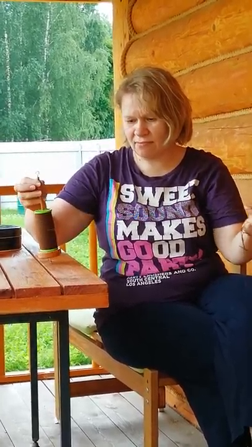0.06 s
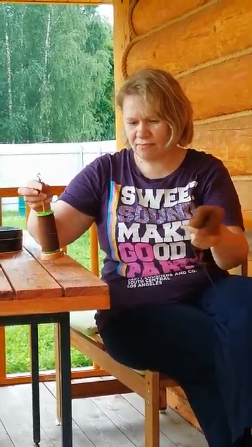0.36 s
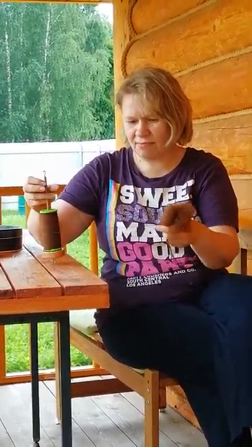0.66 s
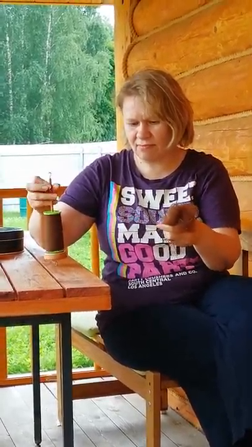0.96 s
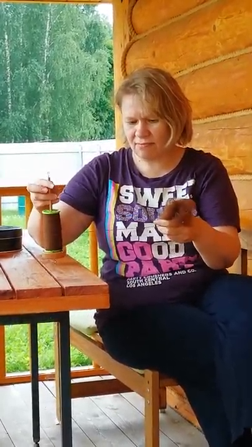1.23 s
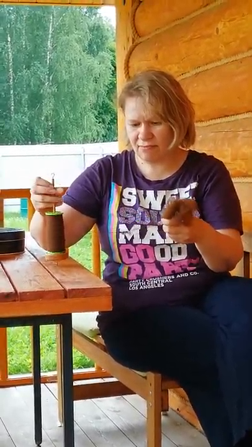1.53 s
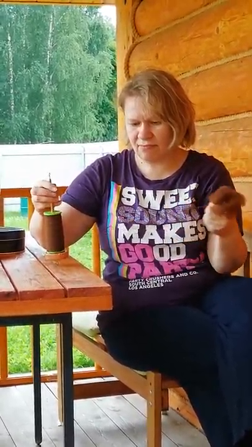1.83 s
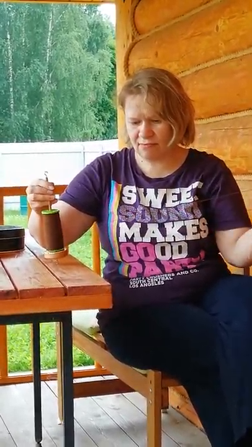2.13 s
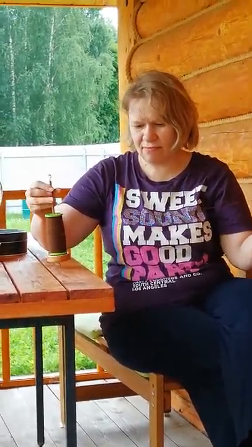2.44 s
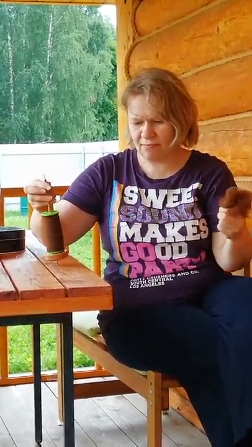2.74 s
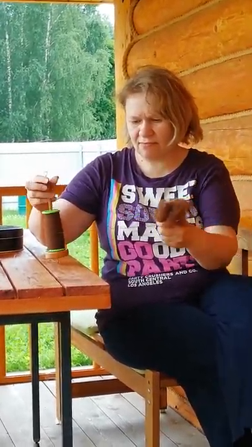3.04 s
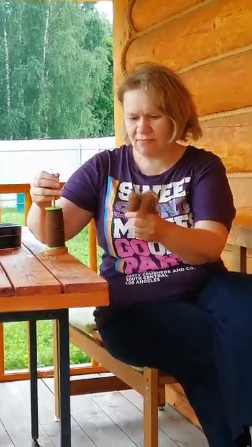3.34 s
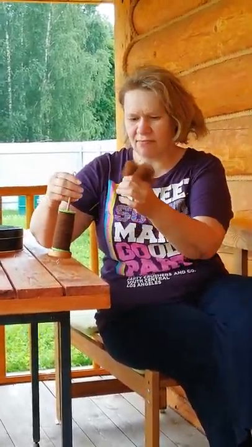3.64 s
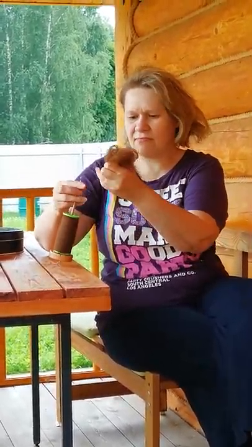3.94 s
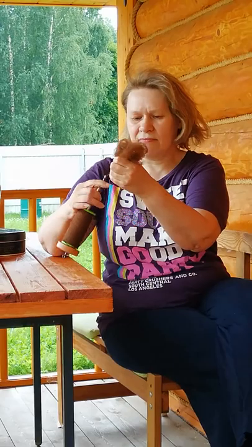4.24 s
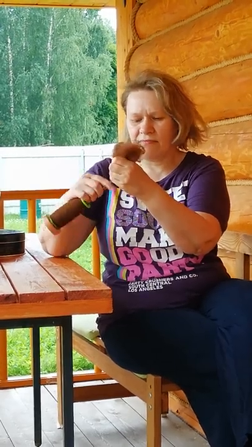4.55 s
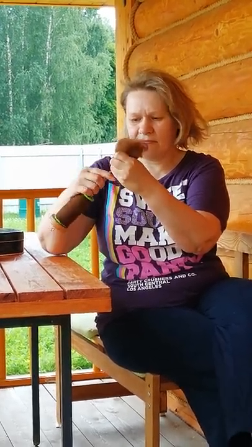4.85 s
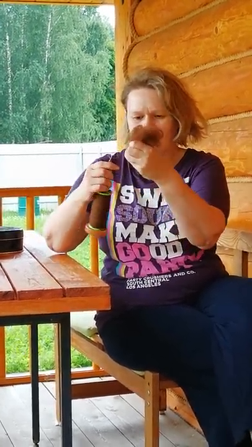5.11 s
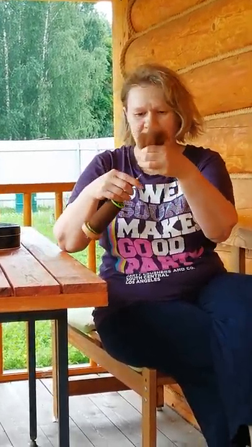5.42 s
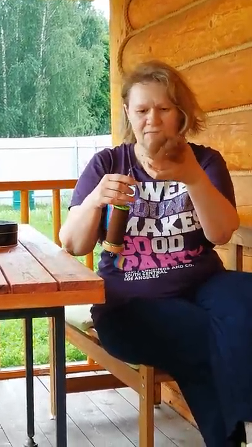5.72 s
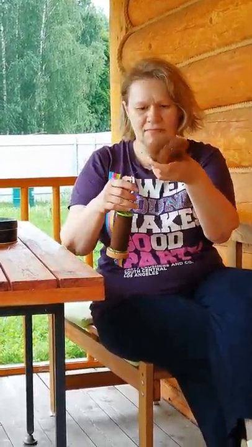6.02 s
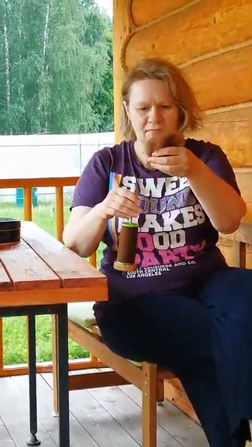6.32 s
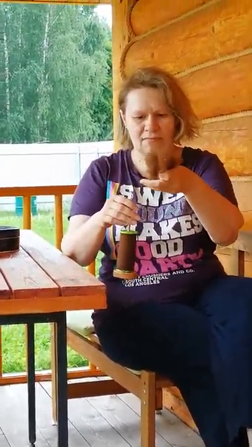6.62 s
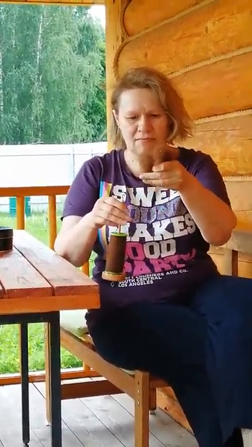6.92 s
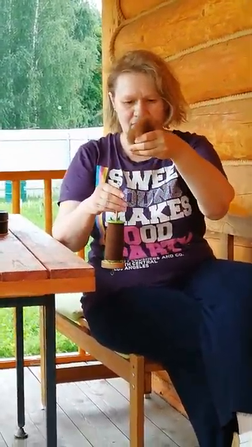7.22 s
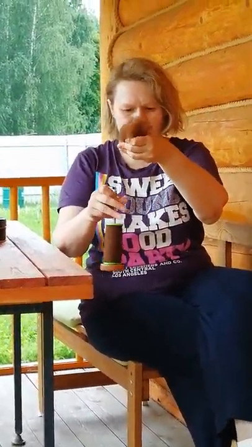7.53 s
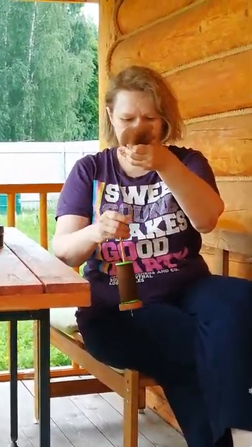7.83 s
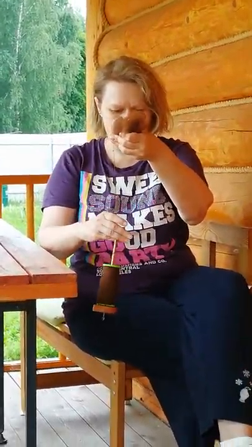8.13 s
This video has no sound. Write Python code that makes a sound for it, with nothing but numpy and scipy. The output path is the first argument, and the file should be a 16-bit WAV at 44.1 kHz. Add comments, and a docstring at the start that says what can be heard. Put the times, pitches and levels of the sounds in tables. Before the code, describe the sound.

Uneven gusts of wind rumble and thump on the microphone outdoors, over a faint hiss of trees and a few tiny handling scuffs.

```python
"""Wind buffeting a phone on a porch

Uneven gusts strike the two microphone ports. One wind force drives a low rumble of large swirls, a flutter
of eddies and, in the hardest gusts, a tearing rush; single hard eddies thump out of the stream.
Behind it trees hiss steadily, something far off hoots softly (perhaps a dog), friction from handling yarn
and a spindle makes faint scuffs and ticks, and a bird calls once."""
import sys
import numpy as np
from scipy.fft import rfft, irfft, next_fast_len
from scipy.io import wavfile
from scipy.ndimage import uniform_filter1d, map_coordinates

SR = 44100
rng = np.random.default_rng(int(sys.argv[2]) if len(sys.argv) > 2 else 0)


def store_wav(level_fs):
    """Save 16-bit WAV to argv[1]."""
    pcm = np.round(np.clip(np.atleast_2d(level_fs), -1, 1) * 32767)
    wavfile.write(sys.argv[1], SR, pcm.T.astype(np.int16))


N = 364707

# gusts on top of the breeze: (start [s], hold [s], force [dB], extra rumble [dB], extra tearing [dB])
WIND_GUSTS = [(0.123, 0.13, -54, 3.5, 0), (0.45, 0.27, -55, 4, 0), (1.223, 0.1, -52.5, 2, 0),
              (1.545, 0.18, -41.5, 0, -2), (2.108, 0.03, -60.5, 0, 2), (2.404, 0.089, -51.5, -6, 0),
              (2.612, 0.067, -41, 2.5, -7), (2.759, 0.014, -39, -3.5, 5), (3.223, 0.0087, -36, 0, 3),
              (3.279, 0.012, -36.5, 7.5, 11), (3.473, 0.061, -36.5, 4, -4), (3.592, 0.033, -32, 2.5, -3),
              (3.658, 0.16, -30, -1, 4.5), (4.267, 0.12, -41.5, -1, -3), (4.522, 0.16, -42.5, 2, -10),
              (4.833, 0.023, -46.5, -9, -3), (5.1, 0.17, -41, 3, -5), (5.319, 0.22, -37, -6, -14),
              (5.617, 0.084, -40.5, -16, 11), (5.761, 0.1, -34, 1, 7), (5.995, 0.14, -32.5, -1, 6),
              (6.36, 0.064, -32, -0.5, 6), (6.578, 0.28, -30.5, -4.5, 0.5), (6.885, 0.11, -36, 4, 11),
              (7.117, 0.076, -33, 5, 1), (7.227, 0.2, -35.5, 4.5, -16), (7.707, 0.2, -38, -2, 1),
              (8.126, 0.022, -41, 4, -11)]
# growth of each wind layer [dB per dB of force]
RUMBLE_SLOPE, FLUTTER_SLOPE, TEARING_SLOPE = 0.61, 0.87, 2.37


def amp(db):
    """Amplitude ratio: a factor of ten for every 20 dB."""
    return 10 ** (np.asarray(db) / 20)


def unit(x):
    """Normalisation to rms 1."""
    return x / np.sqrt(np.mean(x ** 2) + 1e-20)


def along(points, hz):
    """Interpolation of (frequency [Hz], value) points on a logarithmic axis."""
    knots_hz, values = np.transpose(points)
    return np.interp(np.log(hz + 1), np.log(knots_hz + 1), values)


def curves(rows):
    """Linear interpolation in time: one value per sample for each column after the first."""
    times, *columns = np.transpose(rows)
    return [np.interp(np.arange(N) / SR, times, column) for column in columns]


def wobble(rate):
    """Smooth random modulation: a spline through rate Gaussian knots a second."""
    knots = rng.standard_normal(int(N * rate / SR) + 4)
    return map_coordinates(knots, [np.arange(N) * rate / SR])


def filtered(x, response):
    """Linear filtering: the spectrum is multiplied by a complex frequency response."""
    size = next_fast_len(N + 8192)
    return irfft(rfft(x, size) * response(np.fft.rfftfreq(size, 1 / SR)), size)[..., :N]


def steady(x, size):
    """Division by the running rms holds a stereo flow near rms 1 over stretches of size samples."""
    power = uniform_filter1d(uniform_filter1d(np.mean(x ** 2, axis=0), size), size)
    return x / np.sqrt(np.abs(power) + 1e-12)


def wind_force(extra_db, attack_s=0.01, release_s=0.018, usual_db=-40):
    """Power addition of the breeze and exponentially rising and falling gusts, in dB over the usual."""
    # the breeze between the gusts: (time [s], force [dB])
    breeze = [(0.0, -51.5), (0.3, -65), (0.85, -72), (1.13, -70), (1.42, -61), (1.65, -64), (1.92, -80.5),
              (2.26, -78), (2.55, -47), (2.84, -61), (3.17, -58), (3.42, -40.5), (3.92, -53.5),
              (4.17, -57.5), (4.5, -49), (4.78, -60.5), (4.91, -50), (5.03, -52.5), (5.53, -45),
              (6.17, -36.5), (7.03, -40.5), (7.6, -47.5), (8.04, -51), (8.27, -52.5)]
    breeze_db, = curves(breeze)
    power = amp(breeze_db) ** 2
    for (start, hold, db, *_), more_db in zip(WIND_GUSTS, extra_db):
        age = np.arange(N) / SR - start
        rise = np.minimum(age, 0) / attack_s
        fall = np.maximum(age - hold, 0) / release_s
        envelope = np.exp(np.maximum(rise - fall, -40))
        power += (amp(db + more_db) * envelope) ** 2
    return 10 * np.log10(power) - usual_db


def puffs(force_db, depth_db=8, rate=40, firm_db=8, firm_width_db=4):
    """Intermittency: a light flow keeps catching and letting go of the phone; a hard one holds firmer."""
    holes = np.logaddexp(0, 2.1 * wobble(rate))
    ragged = unit(amp(-depth_db * holes))
    firm_share = 0.5 / (1 + np.exp((firm_db - force_db) / firm_width_db))
    return np.sqrt(firm_share + (1 - firm_share) * ragged ** 2)


def eddies(times, strengths, pitches_hz, ports, size=2400):
    """Convected pressure: each eddy is one push and pull on one port; small fast eddies are sharper."""
    lags = np.arange(size) - size // 2
    index = np.round(times * SR).astype(int)[:, None] + lags
    passing = 1 - 1j * np.outer(pitches_hz, np.pi * lags / SR)
    phasors = strengths * np.exp(2j * np.pi * rng.random(len(times)))
    pulses = np.real(phasors[:, None] / passing ** 3)  # the spectrum of each peaks at its pitch
    pulses = pulses * np.hanning(size) * ((index >= 0) & (index < N))
    slots = np.clip(index, 0, N - 1) + N * np.round(ports).astype(int)[:, None]
    return np.bincount(slots.ravel(), pulses.ravel(), 2 * N).reshape(2, N)


def crossfeed(ports, low_hz=42, high_hz=980, lag_s=0.00078, leak=0.55):
    """Crosstalk: the phone band-passes the wind and feeds each port, delayed, to the other channel."""
    ports = filtered(ports, lambda hz: 1j * hz / (low_hz + 1j * hz) / (1 + (hz / high_hz) ** 8))
    return ports + filtered(ports[::-1], lambda hz: leak * np.exp(-2j * np.pi * hz * lag_s))


def eddy_stream(pitch_hz, pitch_spread, spread_db, count, size):
    """Shot noise: many eddies on both ports merge into a flow of rms 1 around a moving pitch."""
    times = (np.arange(count) + rng.random(count)) / count * (N - 1) / SR
    detune, strength = rng.standard_normal((count, 2)).T
    pitches_hz = pitch_hz[(times * SR).astype(int)] * np.exp(pitch_spread * np.clip(detune, -2, 2))
    ports = rng.integers(2, size=count)
    stream = eddies(times, amp(spread_db * strength), pitches_hz, ports, size)
    return steady(crossfeed(stream), size=1500)


def rumble(force_db, usual_level_db=-39.5, side_db=-20):
    """Spatial coherence: swirls larger than the phone press on both ports nearly alike."""
    # pressure spectrum of the swirls: (frequency [Hz], relative density [dB])
    swirl_spectrum = [(8, -28.5), (22, -1.5), (45, -1.5), (75, -2.5), (110, -11.5), (170, -26), (300, -68),
                      (600, -120)]
    mid, side = filtered(rng.standard_normal((2, N)), lambda hz: amp(along(swirl_spectrum, hz)))
    side = side * amp(side_db)
    pressure = steady(np.array([mid + side, mid - side]), size=2000)
    return amp(usual_level_db + RUMBLE_SLOPE * force_db) * pressure


def flutter(force_db, usual_level_db=-39.5, usual_hz=84, octaves_per_db=0.04):
    """Frequency scales with flow speed: in harder wind the eddies pass faster and sound brighter."""
    pitch_hz = usual_hz * 2 ** (octaves_per_db * force_db)
    stream = eddy_stream(pitch_hz, pitch_spread=0.13, spread_db=3.5, count=1900, size=1500)
    return amp(usual_level_db + FLUTTER_SLOPE * force_db) * stream


def tearing(force_db, usual_level_db=-69, usual_hz=215, octaves_per_db=0.01):
    """Turbulent cascade: hard gusts break into many small eddies, a higher rush that grows steeply."""
    pitch_hz = usual_hz * 2 ** (octaves_per_db * force_db)
    stream = eddy_stream(pitch_hz, pitch_spread=0.1, spread_db=7.0, count=3600, size=600)
    return amp(usual_level_db + TEARING_SLOPE * force_db) * stream


def wind():
    """Common modulation: one force drives three layers; big swirls follow it slower and puff less."""
    *_, extra_rumble_db, extra_tearing_db = np.transpose(WIND_GUSTS)
    swirl_db = wind_force(extra_rumble_db / RUMBLE_SLOPE, attack_s=0.014, release_s=0.03)
    eddy_db = wind_force(np.zeros(len(WIND_GUSTS)))
    tear_db = wind_force(extra_tearing_db / TEARING_SLOPE)
    grip = puffs(eddy_db)
    return np.sqrt(grip) * rumble(swirl_db) + grip * (flutter(eddy_db) + tearing(tear_db))


def diffuse_noise(spectrum):
    """A diffuse field of rms 1: the ratio of mid to side sets how alike the two channels are."""
    # likeness of left and right: (frequency [Hz], correlation [-1 to 1])
    correlation = [(60, -0.2), (200, 1), (380, -0.5), (700, -0.48), (1000, 0.18), (1300, 0.62),
                   (2200, -0.22), (4400, -0.05), (8000, 0)]
    # stereo balance: (frequency [Hz], left minus right [dB])
    balance = [(400, 0), (700, 2), (1200, -4), (2300, -1), (4400, -1.5), (8000, 0)]

    def colour(hz):
        angle = np.arccos(np.clip(along(correlation, hz), -1, 1)) / 2
        return amp(along(spectrum, hz)) * np.array([np.cos(angle), np.sin(angle)])

    mid, side = filtered(rng.standard_normal((2, N)), colour)
    stereo = np.array([mid + side, mid - side])
    return unit(filtered(stereo, lambda hz: amp(np.outer([0.5, -0.5], along(balance, hz)))))


def trees(wash_gain_db=7, leaf_gain_db=3.5, shiver_db=0.41):
    """Broadband flow noise: a far wash of wind in the wood and the finer hiss of leaves."""
    # slow drift of the background, before the gains: (time [s], wash level [dB], leaf level [dB])
    drift = [(0.0, -73, -70.5), (1.3, -73, -70.5), (3.0, -73.5, -71), (3.7, -75, -73), (4.2, -73.5, -71),
             (5.2, -74.5, -71.5), (6.3, -75.5, -73), (8.27, -74.5, -72.5)]
    # wind in the far wood: (frequency [Hz], relative density [dB])
    wash_spectrum = [(20, -8), (60, -3.5), (150, 8), (250, 0), (400, 0), (600, -3), (850, -2), (1150, -1),
                     (1650, -4), (2200, -8.5), (3500, -12.5), (8000, -54)]
    # hiss of the leaves: (frequency [Hz], relative density [dB])
    leaf_spectrum = [(700, -36), (1500, -3), (2400, -2), (3300, -1), (4700, -0.5), (6200, -4.5),
                     (8200, -6.5), (10000, -10.5), (12500, -12.5), (15700, -13)]
    wash_db, leaf_db = curves(drift)
    wash = amp(wash_db + wash_gain_db) * diffuse_noise(wash_spectrum)
    hiss = amp(leaf_db + leaf_gain_db + shiver_db * wobble(20)) * diffuse_noise(leaf_spectrum)
    return wash + hiss


def thumps(core_gain_db=-2, core_hz=300, shred_gain_db=-12, scatter_s=0.0059, shred_count=3):
    """Pressure transients of single hard eddies: a tight core gives the pop, shreds around it a rasp."""
    # the hardest eddies, before the gains and the crossfeed:
    # (time [s], body level [dB], pitch [Hz], core level [dB], port [0 left, 1 right])
    hard_eddies = [(0.117, -33, 63.4, -56, 0), (0.498, -28, 61.6, -69, 1), (1.622, -30, 76.5, -52, 0),
                   (1.639, -22, 86, -53, 0), (1.688, -23.5, 95, -46, 0), (1.745, -24, 71, -67, 0),
                   (2.41, -24, 61, -60, 0), (2.678, -29, 65, -76, 0), (2.744, -22, 118, -64, 0),
                   (3.149, -33, 154, -33, 0), (3.232, -18, 114, -20.5, 0), (3.275, -19, 141, -38, 0),
                   (3.291, -45, 160, -26.5, 0), (3.495, -21, 104, -58, 0), (3.613, -19.5, 158, -17.5, 0),
                   (3.672, -20, 160, -16, 0), (3.731, -19.5, 161, -32, 1), (3.756, -34, 153, -25, 1),
                   (3.793, -17, 150, -30, 0), (3.814, -15, 93, -46, 1), (3.932, -35.5, 105, -67, 0),
                   (4.007, -29, 72, -68, 1), (4.104, -34.5, 93, -66, 0), (4.232, -30, 97.5, -63, 0),
                   (4.343, -26, 92, -71, 0), (4.666, -23.5, 78, -51, 1), (4.843, -20, 93, -67, 0),
                   (5.109, -23, 97, -62, 1), (5.491, -21.5, 110, -65, 0), (5.511, -23.5, 160, -54, 0),
                   (5.702, -24.5, 148, -44, 0), (5.787, -15, 151, -28, 0), (5.816, -17.5, 123, -38, 0),
                   (5.908, -17.5, 67, -61, 1), (6.028, -13, 162, -15.5, 1), (6.075, -15, 88.5, -39.5, 0),
                   (6.252, -25.5, 110, -32, 1), (6.396, -12.5, 141, -20.5, 1), (6.583, -29, 132, -37, 1),
                   (6.638, -41, 114, -33, 0), (6.662, -16, 161, -26, 0), (6.706, -18, 71, -26.5, 1),
                   (6.729, -14, 102, -26, 1), (6.793, -24, 161, -57, 0), (6.828, -15.5, 128, -40, 0),
                   (6.932, -21.5, 141, -32.5, 1), (6.956, -17.5, 75, -62, 1), (7.138, -14, 116, -25.5, 0),
                   (7.188, -18, 70, -61, 1), (7.253, -23, 132, -63, 1), (7.42, -19.5, 71.5, -50, 0),
                   (7.719, -22.5, 130, -36, 0), (7.764, -22.5, 168, -33, 0), (7.84, -21.5, 124, -36, 0),
                   (7.861, -19.5, 109, -65, 0), (7.934, -20.5, 83, -66, 0), (8.011, -35, 75, -64, 0)]
    times, body_db, pitches_hz, core_db, ports = np.transpose(hard_eddies)
    tight_hz = np.full(len(times), core_hz)
    body = eddies(times, amp(body_db), pitches_hz, ports)
    core = eddies(times, amp(core_db + core_gain_db), tight_hz, ports)
    offsets = scatter_s * rng.standard_normal((len(times), shred_count))
    shreds = sum(eddies(times + offset, amp(core_db + shred_gain_db), tight_hz, ports)
                 for offset in offsets.T)
    return crossfeed(body + core + shreds)


def band(hz, centre_hz, octaves):
    """A Gaussian pass band on a logarithmic frequency axis."""
    return np.exp(-0.5 * (np.log2((hz + 1) / centre_hz) / octaves) ** 2)


def bursts(events, size=16384):
    """Band noise under Gaussian envelopes, from (peak time [s], half-width [s], level [dB], bands)."""
    out = np.zeros((2, N + size))
    age = (np.arange(size) - size // 2) / SR
    hz = np.fft.rfftfreq(size, 1 / SR)
    for time, width, db, bands in events:
        colour = sum(amp(band_db) * band(hz, centre_hz, octaves) for centre_hz, octaves, band_db in bands)
        noise = unit(irfft(rfft(rng.standard_normal((2, size))) * colour))
        start = round(time * SR)
        out[:, start:start + size] += amp(db) * noise * np.exp(-(age / width) ** 2)
    return out[:, size // 2:size // 2 + N]


def hoots():
    """Resonance: a far animal, perhaps a dog, blurred by distance into soft swells of two formants."""
    # the hoots: (peak time [s], half-width [s], level [dB])
    calls = [(0.205, .045, -66.5), (0.61, 0.037, -61), (2.936, 0.073, -62), (4.175, 0.11, -69.5)]
    # resonances of every hoot: (centre [Hz], width [octaves], relative level [dB])
    formants = [(332, 0.16, 0.5), (756, 0.52, -13)]
    return bursts([(time, width, db, formants) for time, width, db in calls])


def handling(grain_db=4.0):
    """Friction noise: each scuff is a short swell in one band, made grainy by fast random modulation."""
    # rubs of yarn, spindle and clothes:
    # (peak time [s], half-width [s], level [dB], centre [Hz], width [octaves])
    scuffs = [(.465, 0.013, -73, 7400, 0.29), (2.124, .02, -64, 3500, 0.6), (2.129, 0.021, -65.5, 1640, .3),
              (4.13, 0.018, -75, 6800, 0.39), (4.163, 0.043, -72, 2000, .5), (4.73, 0.1, -69, 1240, .11),
              (4.75, 0.1, -72.5, 1750, .3), (5.772, 0.03, -71.5, 1600, 0.36),
              (6.051, 0.029, -70.5, 1600, 0.4), (7.024, 0.014, -75, 6740, .35),
              (7.634, 0.059, -79, 6700, .3)]
    rubs = bursts([(time, width, db, [(hz, octaves, 0)]) for time, width, db, hz, octaves in scuffs])
    return rubs * amp(grain_db * wobble(130))


def bird(blur_hz=130):
    """Spectral broadening: a thin high note is blurred into a narrow band on its way through the trees."""
    # contour of the note: (time [s], pitch [Hz], level [dB])
    note = [(6.52, 8200, -115), (6.545, 8200, -75), (6.61, 8280, -78), (6.66, 8450, -81),
            (6.69, 8450, -115)]
    pitch_hz, level_db = curves(note)
    tone = np.sin(2 * np.pi * np.cumsum(pitch_hz) / SR)
    blur = unit(filtered(rng.standard_normal((2, N)), lambda hz: np.exp(-(hz / blur_hz) ** 2)))
    return amp(level_db) * unit(blur * tone)


def scene():
    """Superposition: wind on the ports adds to the quiet sounds of the garden."""
    return wind() + thumps() + trees() + handling() + hoots() + bird()


def record(dry):
    """Band limiting: the phone passes nothing above its cutoff."""
    cutoff_hz = 15700
    return filtered(dry, lambda hz: hz < cutoff_hz)


dry = scene()
out = record(dry)
store_wav(out)
```